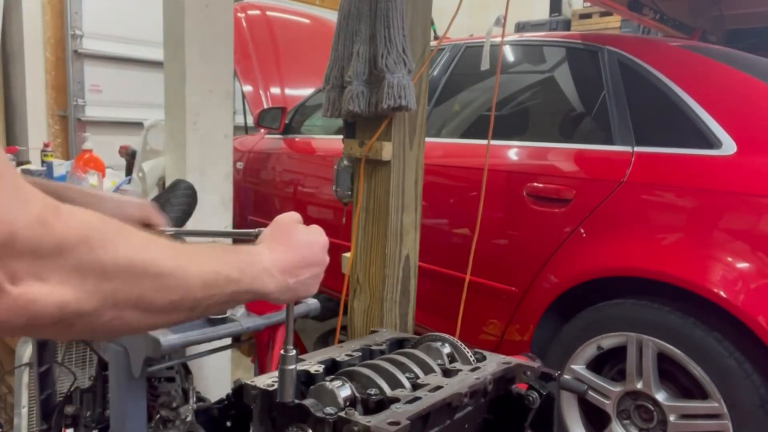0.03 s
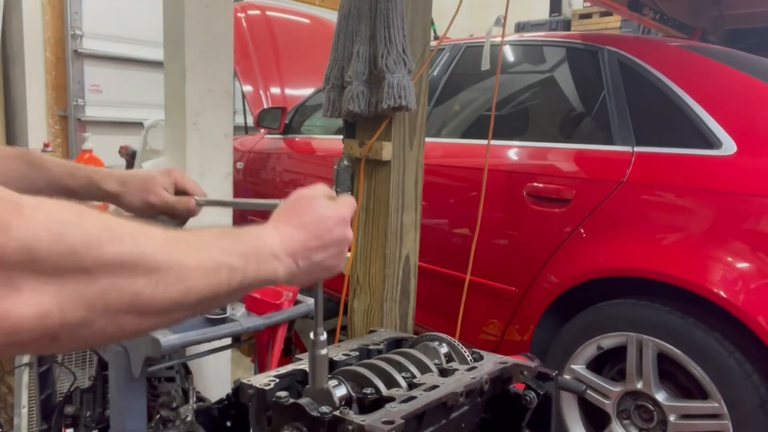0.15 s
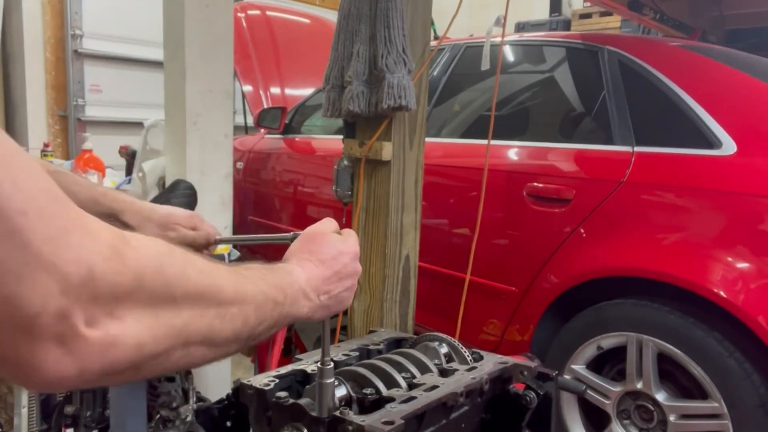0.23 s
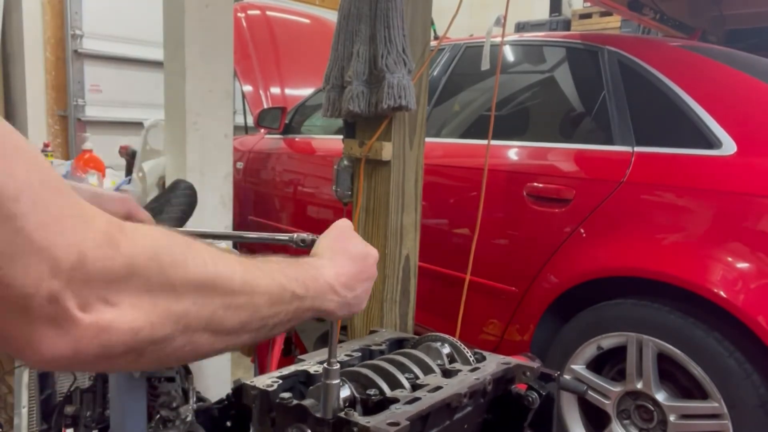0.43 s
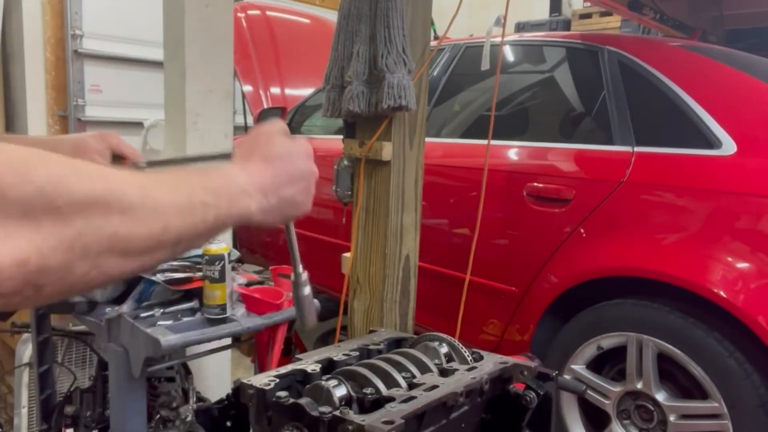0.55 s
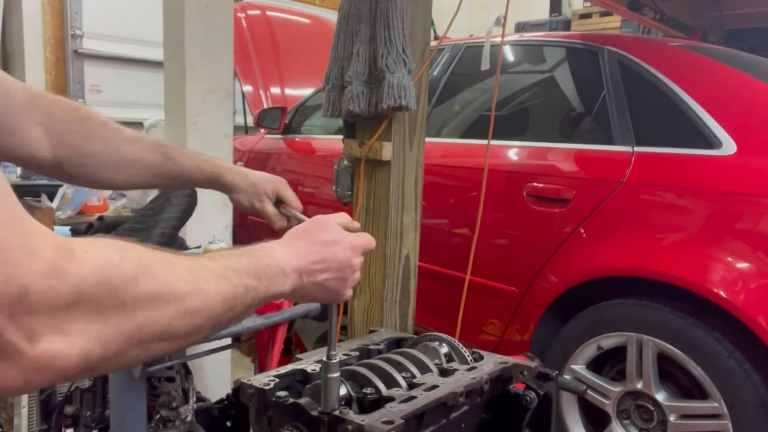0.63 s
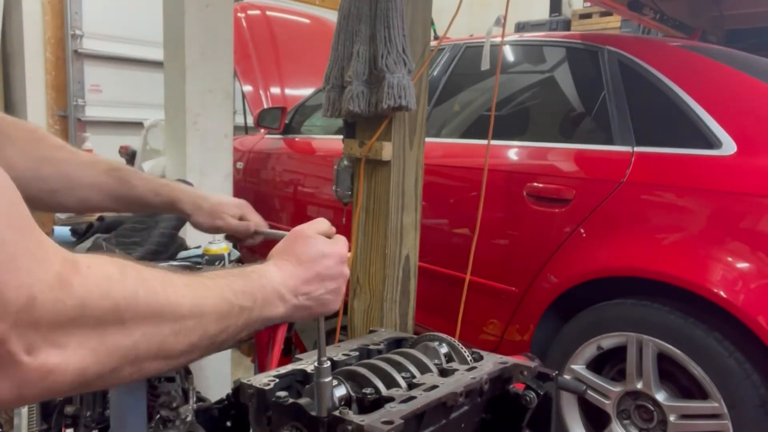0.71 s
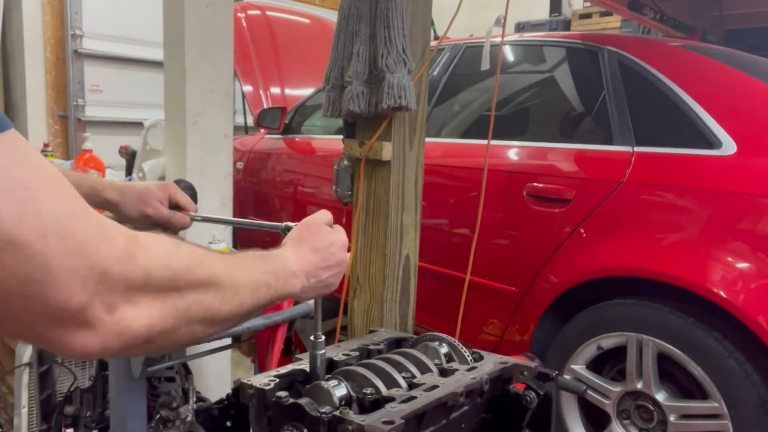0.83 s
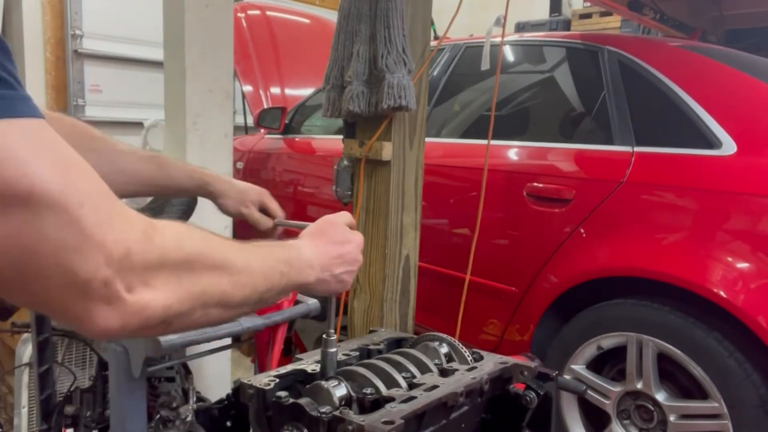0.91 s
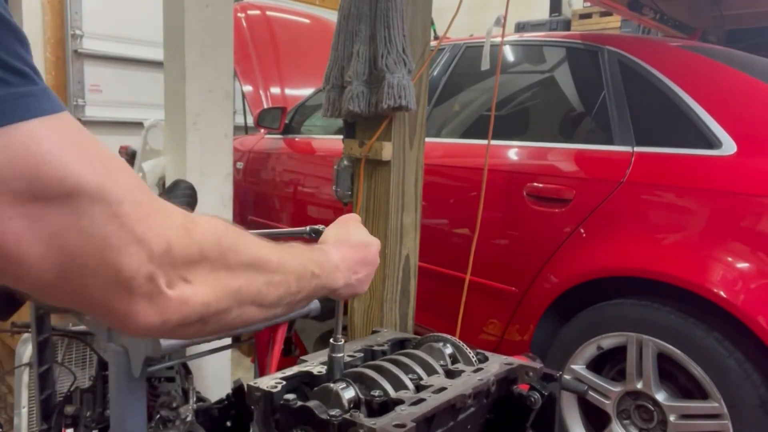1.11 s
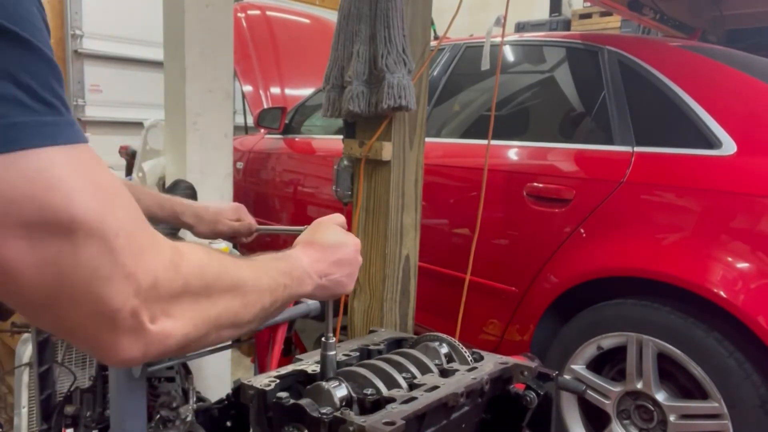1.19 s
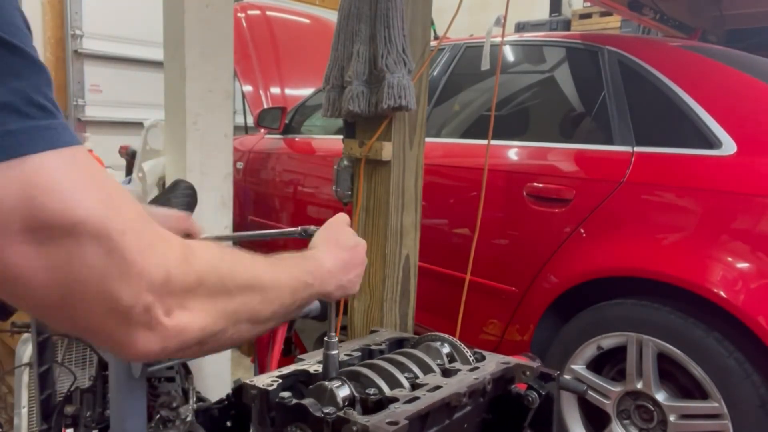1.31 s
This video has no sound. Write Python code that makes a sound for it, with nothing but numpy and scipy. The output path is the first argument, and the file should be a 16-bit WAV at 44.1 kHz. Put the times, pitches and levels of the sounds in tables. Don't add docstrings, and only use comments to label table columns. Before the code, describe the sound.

A ratchet and socket loosen bolts on an engine block: early clicks and a knock, three short squeaks, a loudest squeak with hard clacks around half a second, then sparse fine ticks; close phone microphone, quiet garage.

```python
import sys
import numpy as np
from scipy import signal
from scipy.fft import rfft, irfft
from scipy.io import wavfile
from scipy.ndimage import uniform_filter1d

SR = 44100
rng = np.random.default_rng(int(sys.argv[2]) if len(sys.argv) > 2 else 0)


def dump(signal):
    limited = np.clip(np.atleast_2d(signal).T, -1, 1)
    pcm = np.round(limited * 32767).astype(np.int16)
    wavfile.write(sys.argv[1], SR, pcm)


def boost_factor(decibels):
    exponent = np.asarray(decibels, float) / 20
    return 10 ** exponent


N = 59535
T = np.arange(N) / SR
SIDES = np.array([[1], [-1]])
WIDE = .55


def unit(x):
    return x / np.sqrt(np.mean(x ** 2))


def walk(rate_hz, count=N):
    k = max(int(SR / rate_hz), 2)
    smooth = uniform_filter1d(rng.standard_normal(N), k)
    return unit(uniform_filter1d(smooth, k))[:count]


def tinted(hz, db, channels=1, size=N):
    log_f = np.log(np.maximum(np.arange(size // 2 + 1) * SR / size, 20))
    gain = boost_factor(np.interp(log_f, np.log(hz), db))
    return unit(irfft(rfft(rng.standard_normal((channels, size))) * gain, size))


def hump(hz, octaves, channels=1):
    grid_hz = np.geomspace(50, 22000, num=60)
    db = -6 * (2 * np.log2(grid_hz / hz) / octaves) ** 2
    return tinted(grid_hz, np.maximum(db, -60), channels=channels, size=8192)


def pair(hz, octaves, count):
    mid, side = hump(hz, octaves, channels=2)[:, :count]
    return mid + WIDE * min(hz / 4000, 1) * side * SIDES


def decay(t, t60_s):
    return np.exp(-np.log(1000) * t / t60_s)


def add(out, s, x, pan_db):
    i = int(round(s * SR))
    x = x[..., :N - i]
    out[:, i:i + x.shape[-1]] += x * boost_factor(SIDES * pan_db / 2)


# (frequency [Hz], level [dB per Hz])
AIR_SPECTRUM = [(59, -64), (100, -27.5), (518, 7), (1170, 3.5), (1990, -0.5), (2520, -6), (9000, -25),
                (15000, -24), (16500, -47.5)]
# (time [s], level [dB])
AIR_SWELL = [
    (0, -11),
    (.36, -11.5),
    (.44, -13.5),
    (.55, -2.5),
    (.72, -20.5),
    (.8, -18.5),
    (1.15, -23),
    (1.22, -12.5),
    (1.35, -15),
]
AIR_DB, HISS_DB = -58.5, -80


def garage():
    hz, db = np.array(AIR_SPECTRUM).T
    mid = tinted(hz, db)[0]
    side = tinted(hz, db + 4.5 * np.log2(hz / 1000))[0]
    swell_db = AIR_DB + np.interp(T, *np.array(AIR_SWELL).T)
    flicker = boost_factor(1.5 * walk(25))
    air = boost_factor(swell_db) * flicker * (mid + 0.15 * side * SIDES)
    return air + boost_factor(HISS_DB) * rng.standard_normal((2, N))


ROOM_DB, ROOM_T60_S, ROOM_ONSET_S = -12, 0.037, 0.0048


def reflections(near):
    t = T[:int(.15 * SR)]
    tail = pair(3500, 12.0, len(t)) * decay(t, ROOM_T60_S) * (t > ROOM_ONSET_S)
    tail = tail / np.sqrt(np.sum(tail ** 2) / 2)
    return boost_factor(ROOM_DB) * signal.fftconvolve(near, tail, axes=1)[:, :N]


# (time [s], length [s], level [dB], centre [Hz], width [octaves])
SLIDES = [(0, 0.005, -51, 8900, 2.4), (0.056, 0.024, -55, 13800, 4), (0.102, 0.05, -56.5, 2780, 3.4),
          (0.166, 0.037, -64.5, 9000, 3.5), (0.198, 0.0066, -41, 3940, 7), (.229, 0.02, -50, 7800, 4.7),
          (0.243, 0.03, -50, 4000, 3.5), (.266, .032, -47, 8000, 2.2), (.309, .012, -48, 6500, 3),
          (.319, .025, -48, 6000, 4), (.242, 0.1, -47.5, 1910, 2.47), (0.46, 0.069, -44.5, 2538, 2),
          (0.362, 0.028, -62, 6000, 2.1), (.468, .03, -46, 8000, 4), (0.495, 0.018, -37, 8000, 2.4),
          (.508, .02, -45, 8000, 3.5), (0.851, 0.012, -62, 6000, 4), (0.862, 0.05, -54, 4000, 5),
          (0.536, 0.015, -39.5, 6860, 3.9), (0.567, 0.022, -36.5, 5260, 2), (0.589, .060, -57.5, 9400, 2.9),
          (0.666, 0.071, -56, 6900, 24), (0.746, 0.0036, -53, 12430, 0.65), (0.805, 0.008, -61, 12400, 2.2),
          (0.813, 0.0083, -54, 12700, 2.5), (0.992, 0.008, -63, 14800, 0.49),
          (0.96, 0.0072, -48, 8600, 2.1), (0.986, 0.041, -68.5, 5000, 3.3), (1.086, 0.014, -79, 12320, 1),
          (1.159, 0.076, -68, 10040, 8.3), (1.332, 0.024, -63.5, 12070, 4)]
GRAIN_DB, EDGE_S = 2.0, .005


def scrapes():
    out = np.zeros((2, N))
    for s, length_s, db, hz, octaves in SLIDES:
        t = np.arange(int((length_s + 3 * EDGE_S) * SR)) / SR
        rise = np.clip(t / EDGE_S, 0, 1)
        release = np.exp(-np.maximum(t - length_s, 0) / EDGE_S)
        shape = rise * release * boost_factor(-9 * t / length_s)
        grain = boost_factor(db + GRAIN_DB * walk(300, count=len(t)))
        add(out, s, grain * shape * pair(hz, octaves, len(t)), -.5)
    return out


RATTLE_DB, CRACK_S = 2.2, .0009
SNAP_T60_S, CRACK_OCTAVES = .01, 2.4


def blow(db, hz, t60_s, modes, octaves, crack_db, noise_db, count):
    t = T[:count]
    f, size, phase, side_phase = modes
    snap = 2 * decay(t, SNAP_T60_S) * (hz > 8000)
    fade = (decay(t, t60_s) + snap) * (1 - np.exp(-t * hz / 6))
    angle = 2 * np.pi * f * t + 3 * phase
    offset = WIDE * np.minimum(f / 4000, 1) * side_phase
    ring = np.array([np.sum(size * np.sin(angle + side * offset), axis=0) for side in (-1, 1)])
    ring = ring / np.sqrt(np.sum(size ** 2))
    ring = ring + boost_factor(noise_db) * pair(hz, octaves, count)
    ring = ring * fade * boost_factor(RATTLE_DB * walk(hz / 12, count=count))
    burst = 2 * t / CRACK_S * np.exp(-t / CRACK_S)
    both = ring + boost_factor(crack_db) * pair(hz, CRACK_OCTAVES, count) * burst
    return boost_factor(db) * both * np.sqrt(np.sum(fade ** 2) / np.sum(both ** 2))


# (time [s], level [dB], centre [Hz], t60 [s])
DULL_BLOWS = [(.0510, -28, 2200, 0.009), (.1960, -38, 4000, .008), (.2015, -41.5, 3330, 0.036),
              (.2020, -39.5, 5560, 0.015), (.2045, -29.5, 787, 0.018), (.2040, -34.5, 513, 0.018),
              (.3030, -21, 398, 0.014), (.3010, -33, 860, 0.029), (.2430, -26, 5400, 0.026),
              (.3110, -45, 5060, .02), (.5135, -31.5, 2300, .012), (.5345, -16.5, 3460, 0.0048),
              (.5440, -30, 394, 0.039), (.5460, -26, 880, 0.02), (.5750, -14.5, 5570, 0.014),
              (.5760, -21, 6460, 0.0074), (.5770, -31.5, 1930, 0.02), (.5870, -36.5, 1136, 0.02),
              (.6150, -54, 875, 0.092), (.6040, -54, 5640, 0.21), (.6900, -42, 590, 0.049),
              (.6920, -36.5, 424, 0.033), (.6900, -42, 1363, 0.027), (.7260, -35.5, 5460, 0.0079),
              (.8830, -31, 1135, 0.017), (.8840, -39, 2900, 0.029), (.9700, -52, 492, 0.03),
              (1.1945, -56.5, 3590, 0.023)]


def knocks():
    out = np.zeros((2, N))
    for s, db, hz, t60_s in DULL_BLOWS:
        r = rng.standard_normal((13, 4))[:6]
        modes = hz * 2 ** (.1 * r[:, :1]), np.ones((6, 1)), r[:, 2:3], r[:, 3:]
        x = blow(db, hz, t60_s, modes, octaves=.4, crack_db=-16, noise_db=3, count=8000)
        add(out, s, x, -.8)
    return out


PAWL_MODES_HZ = [5400, 6500, 7900, 9900, 10900, 11650, 12150, 12670, 13250, 14000, 14350, 14700, 15400]
# (time [s], level [dB], brightest [Hz], t60 [s])
PAWL_TICKS = [(.0008, -52.5, 13200, 0.02), (.0345, -64, 11200, 0.016), (.0600, -51.5, 13100, 0.0058),
              (.0925, -50.5, 12840, 0.025), (.1390, -50.5, 14000, 0.0095), (.1955, -36.5, 12600, .012),
              (.2014, -33.5, 13500, .015), (.2990, -54, 13000, 0.013), (.3100, -37, 9000, 0.023),
              (.5345, -37, 11100, 0.015), (.5410, -29, 12600, 0.0093), (.6033, -36, 10700, 0.028),
              (.6628, -33.5, 13300, 0.014), (.6655, -31.5, 13040, 0.014), (.6889, -31, 10200, 0.012),
              (.6891, -32, 13000, .012), (.6763, -53, 13500, .02), (.6842, -54, 13200, 0.032),
              (.7233, -42.5, 12800, 0.0091), (.7256, -43, 13200, 0.011), (.8580, -34.5, 14580, 0.0088),
              (.9350, -68, 14400, 0.019), (.9428, -51.5, 14300, 0.0087), (.9617, -34.5, 11440, 0.017),
              (.9930, -53, 14700, 0.011), (.9972, -52, 14500, 0.012), (1.0030, -58, 14400, 0.017),
              (1.0150, -53, 14700, 0.011), (1.0290, -83, 14000, .01), (1.0610, -80, 9010, 0.0081),
              (1.1340, -84, 11000, .01), (1.1615, -52, 13450, 0.015), (1.1678, -52, 14400, 0.0085),
              (1.1718, -50, 14560, .02), (1.1860, -62.5, 13600, 0.017), (1.1943, -51, 14220, 0.012),
              (1.2053, -61.5, 13980, 0.017), (1.2140, -71, 10200, 0.0079), (1.3309, -58, 10800, 0.016)]
MODE_SPREAD_OCT = .15


def ticks():
    out = np.zeros((2, N))
    for s, db, hz, t60_s in PAWL_TICKS:
        r = rng.standard_normal((13, 4))
        f = np.array(PAWL_MODES_HZ)[:, None] * (1 + .006 * r[:, :1])
        nearness = np.exp(-(np.log2(f / hz) / MODE_SPREAD_OCT) ** 2 / 2)
        modes = f, (nearness + .08) * boost_factor(3 * r[:, 1:2]), r[:, 2:3], r[:, 3:]
        x = blow(db, hz, t60_s, modes, octaves=4 * MODE_SPREAD_OCT, crack_db=-3, noise_db=-4.0, count=3000)
        add(out, s, x, -.8)
    return out


# (frequency [Hz], width [Hz], lift [dB])
SOCKET_MODES = [
    (5350, 400, 5),
    (6400, 350, 6),
]


def socket_lift_db(f):
    return sum(top_db / (1 + (2 * (f - mode_hz) / width_hz) ** 2) for mode_hz, width_hz, top_db in SOCKET_MODES)


# (time [s], slip rate [Hz], level [dB])
SLIPS = [
    [(0.2412, 1800, -48), (0.2435, 1720, -31), (0.2465, 1650, -30), (0.2495, 1615, -34), (0.256, 1615, -29),
     (0.266, 1545, -33), (0.272, 1490, -45)],
    [(0.2860, 1850, -48), (0.2885, 1780, -34), (0.293, 1740, -35), (0.2965, 1610, -44), (0.302, 1480, -56)],
    [(0.3180, 1900, -48), (0.3205, 1850, -28), (0.3265, 1750, -28), (0.3305, 1660, -42), (0.337, 1500, -54)],
    [(0.4620, 3600, -54), (0.469, 1940, -32), (0.4725, 1895, -23.5), (0.4795, 1870, -22),
     (0.483, 1775, -26), (0.488, 1760, -25), (0.4975, 1600, -29), (0.503, 1510, -42), (0.514, 1380, -48)],
    [(0.8594, 1870, -50), (0.8615, 1840, -34), (0.871, 1730, -31), (0.879, 1725, -34), (0.8825, 1600, -35),
     (0.885, 1500, -47), (0.891, 1380, -54)],
]
SLIP_OVERTONES = [
    [0, -2, -9, -10, -24, -24, -24, -27, -25, -24],
    [0, -7, -18, -21, -22, -30, -32, -34, -36, -38],
    [0, -4, -7, -12, -16, -22, -23, -19, -26, -32],
    [-2, 1, -11, -18, -23, -25, -26, -25, -32, -36],
    [0, -6, -15, -13, -17, -27, -34, -33, -38, -42],
]
SLIP_PAN_DB = [
    1.4,
    11,
    2.3,
    .6,
    2.7,
]
# (time [s], duration [s], level [dB])
SLIP_SHARPNESS = [
    (.260, .007, 10),
    (.290, .004, 3),
    (.325, .004, 3),
    (.4985, .003, 14),
    (.884, .0025, -16),
]
JITTER, FLUTTER_DB, GRIT_DB = .007, 1.1, -23
EFFORT_TILT, FULL_SLIP_DB = 1.2, 4


def squeaks():
    out = np.zeros((2, N))
    for rows, over_db, pan_db, bite in zip(SLIPS, SLIP_OVERTONES, SLIP_PAN_DB, SLIP_SHARPNESS):
        s, hz, db = np.array(rows).T
        sharp_s, lasts_s, sharp_db = bite
        t = np.arange(s[0], s[-1], 1 / SR)
        n = len(t)
        level_db = np.interp(t, s, db)
        rate_hz = np.exp(np.interp(t, s, np.log(hz)))
        sharp = sharp_db * np.exp(-((t - sharp_s) / lasts_s) ** 2 / 2)
        weakness_db = np.minimum(level_db - db.max() + FULL_SLIP_DB, 0)
        turn = 2 * np.pi * np.cumsum(rate_hz * (1 + JITTER * walk(190, count=n))) / SR
        tone = np.zeros(n)
        for k, d in enumerate(over_db):
            tone_db = d + socket_lift_db((k + 1) * rate_hz) + sharp * min(k, 3) / 3
            tone_db = tone_db + FLUTTER_DB * min(k + .5, 2) * walk(87, count=n)
            tone_db = tone_db + EFFORT_TILT * min(k, 2) * weakness_db
            tone += boost_factor(tone_db) * np.sin((k + 1) * turn + k * k * 0.55)
        level = boost_factor(level_db)
        tone *= np.sqrt(np.sum(level ** 2) / np.sum((tone * level) ** 2))
        grit = boost_factor(GRIT_DB) * (1 + np.cos(turn)) * hump(6000, 3.0)[0, :n]
        stop = np.minimum(1, (s[-1] - t) / 0.00067)
        add(out, s[0], (tone + grit) * level * stop, pan_db)
    return out


PORT_RAD, PORT_HZ = 1.2, 3800


def left_port_lead(x):
    f = np.arange(N // 2 + 1) * SR / N
    phase = PORT_RAD * np.tanh((f / PORT_HZ) ** 1.5) / (1 + (f / 13000) ** 4)
    return irfft(rfft(x) * np.exp(1j * phase), N)


def scene():
    near = squeaks() + ticks() + knocks() + scrapes()
    direct = np.array([left_port_lead(near[0]), near[1]])
    return direct + reflections(near) + garage()


def band_limit(x):
    return signal.sosfilt(signal.butter(12, 16780, fs=SR, output="sos"), x)


def record(dry):
    low_cut = signal.butter(4, 384, "high", fs=SR, output="sos")
    top_cut = signal.ellip(8, .2, 60, 15900, fs=SR, output="sos")
    mix = signal.sosfilt(top_cut, signal.sosfilt(low_cut, dry))
    return band_limit(mix)


dry = scene()
out = record(dry)
dump(out)
```